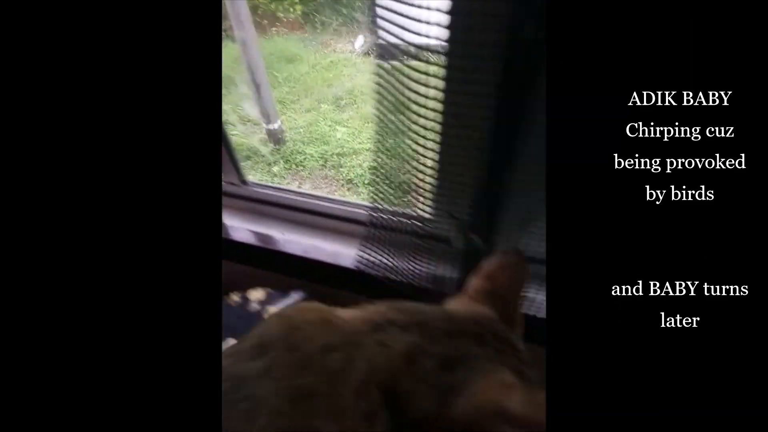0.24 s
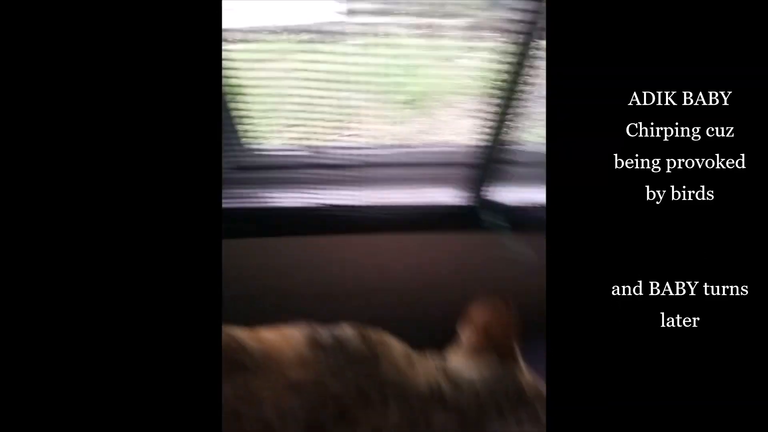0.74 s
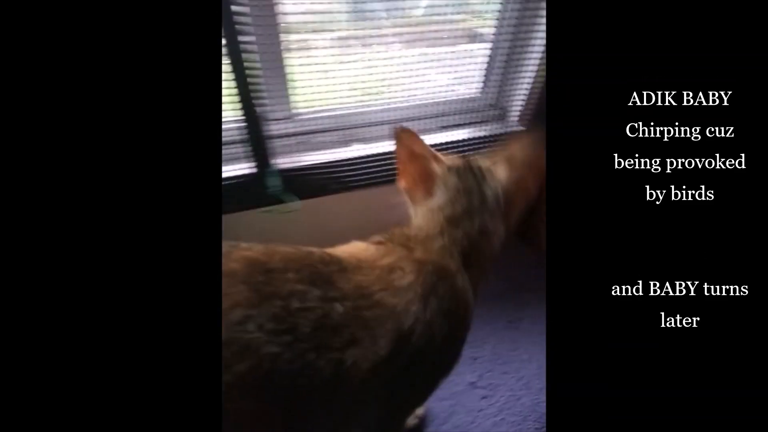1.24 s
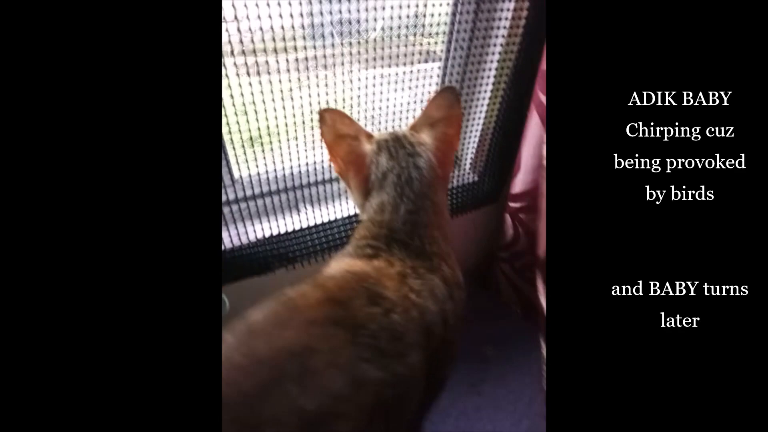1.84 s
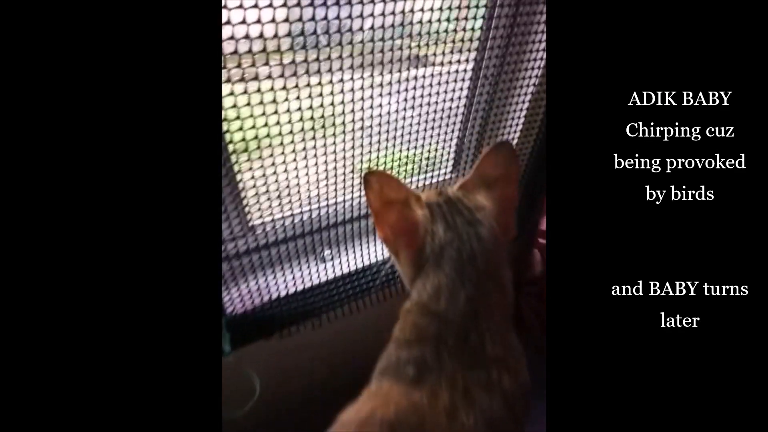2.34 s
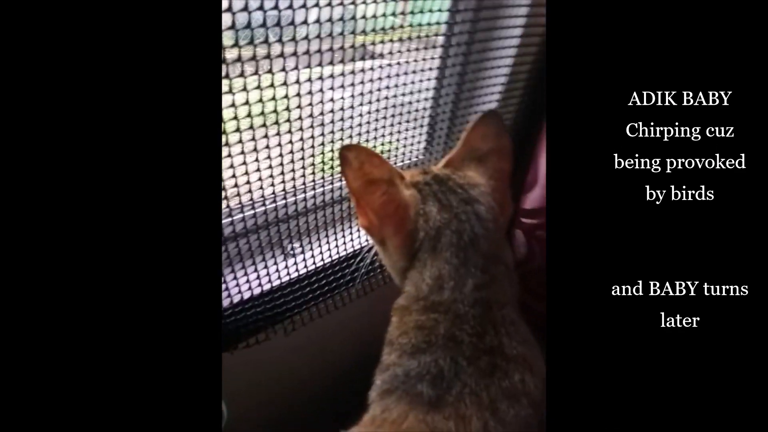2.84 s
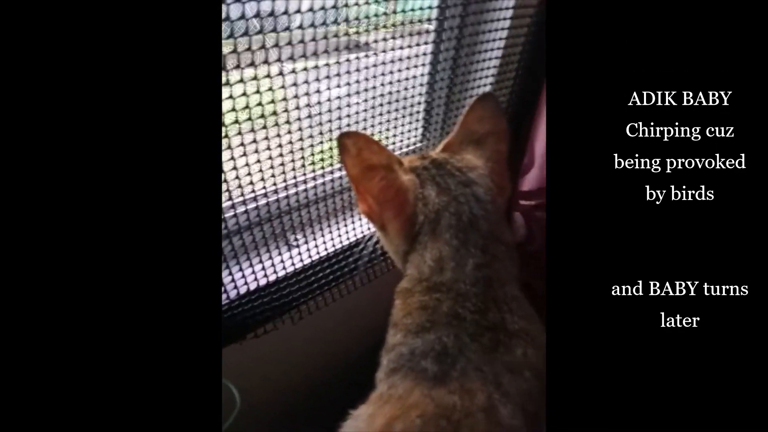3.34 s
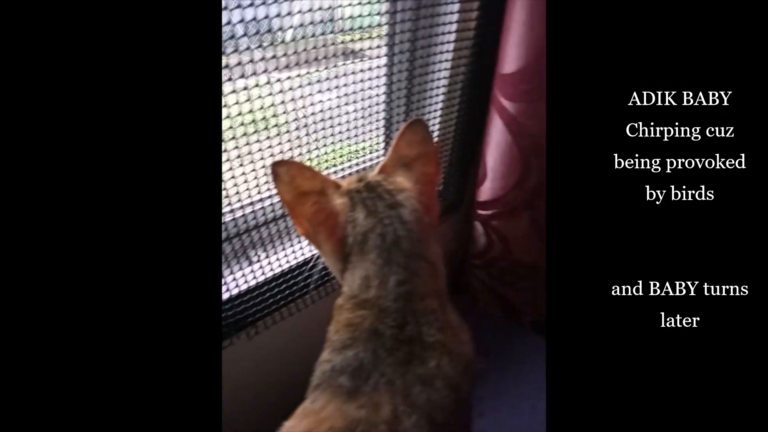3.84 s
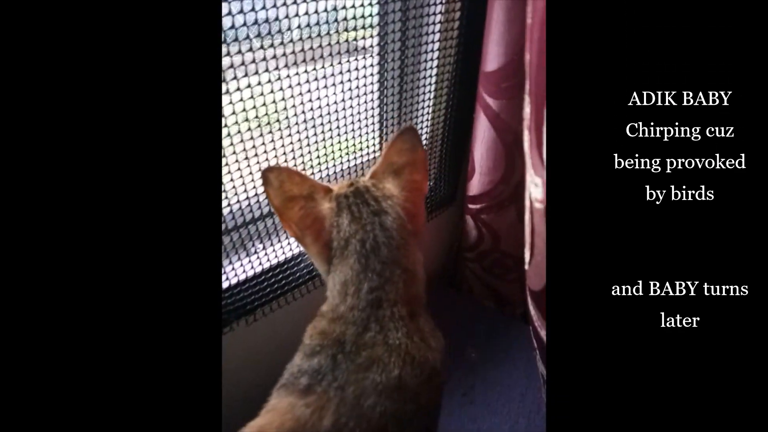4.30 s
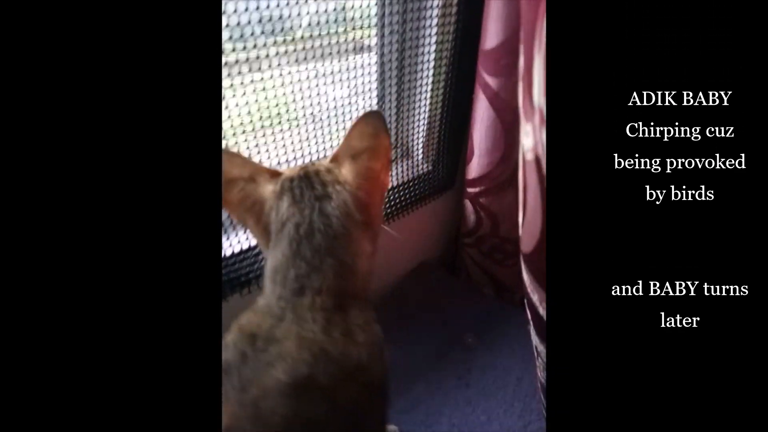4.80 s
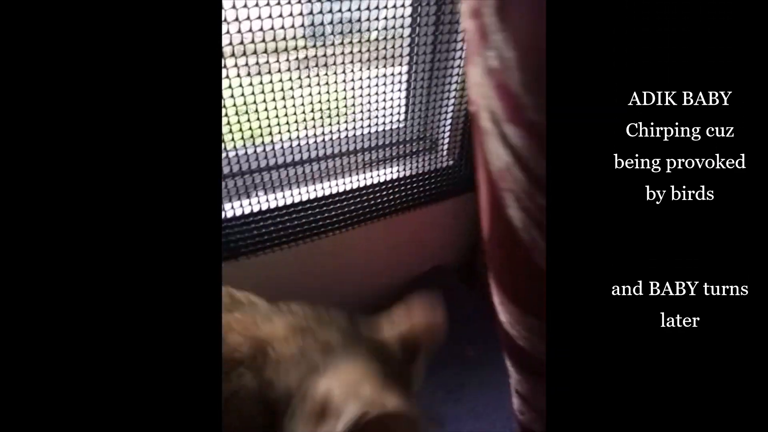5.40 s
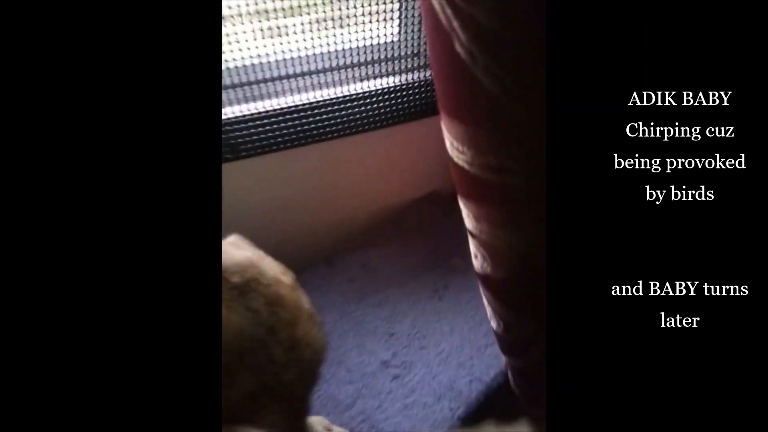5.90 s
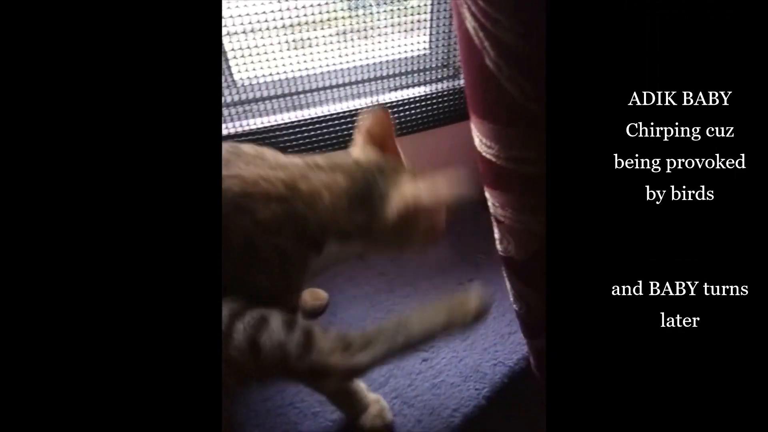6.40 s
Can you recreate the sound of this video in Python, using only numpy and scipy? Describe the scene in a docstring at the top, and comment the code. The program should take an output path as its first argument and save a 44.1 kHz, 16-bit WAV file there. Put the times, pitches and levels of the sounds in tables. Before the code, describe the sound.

A cat chatters at a window in three tiny bursts of short chirps over soft outdoor rumble, with handling creaks and one hard knock.

```python
"""Cat chattering at a screened window

A cat at a window chatters at birds: short chirps, harmonic sums whose pitch jumps from note to note.
A hand creaks, bumps and once knocks a phone's case: damped rings, bands of noise and one pulse.
Claws pluck and tick on the screen; a small room answers cat and screen with decaying noise tails.
Coloured noise makes the outdoor rumble, roar and hiss; sines make a faint hum, drones and thin whistles."""
import sys
import numpy as np
from scipy import signal
from scipy.fft import rfft, irfft, next_fast_len
from scipy.io import wavfile
from scipy.ndimage import uniform_filter1d, map_coordinates

SR = 44100
rng = np.random.default_rng(int(sys.argv[2]) if len(sys.argv) > 2 else 0)


def master(y):
    """Save y as 16-bit WAV."""
    cut = np.clip(np.atleast_2d(y).T, -1, 1)
    pcm = np.round(cut * 32767)  # scale
    wavfile.write(sys.argv[1], SR, pcm.astype(np.int16))


N = 293339


def amp(db):
    """Decibel law: the amplitude gain of a level in dB."""
    return 10 ** (np.asarray(db) / 20)


def unit(x):
    """Normalization: x at rms 1."""
    return x / np.sqrt(np.mean(x ** 2) + 1e-20)


def along(points, hz):
    """Spectral envelope: (Hz, value) points read on a logarithmic frequency axis."""
    f, v = np.transpose(points)
    return np.interp(np.log(hz + 1), np.log(f + 1), v)


def curves(rows, t):
    """Time envelopes: each column after the time, read at times t."""
    s, *columns = np.transpose(rows)
    return [np.interp(t, s, column) for column in columns]


def wobble(rate, size=N):
    """Slow random modulation: a smooth curve through random knots, rate of them a second."""
    knots = rng.standard_normal(int(size * rate / SR) + 4)
    return map_coordinates(knots, [np.arange(size) * rate / SR])


def filtered(x, response):
    """Linear filtering: the spectrum of x times a response of frequency."""
    m = next_fast_len(N + 8192)
    return irfft(rfft(x, m) * response(np.fft.rfftfreq(m, 1 / SR)), m)[..., :N]


def rush(spectrum, patchy_db):
    """Coloured noise of rms 1, its gain varying in patches of time and frequency."""
    z = signal.stft(rng.standard_normal(N + 512), nperseg=512)[2]
    field = uniform_filter1d(rng.standard_normal(z.shape), size=4, axis=0)
    field = uniform_filter1d(field, size=8, axis=1)
    noise = signal.istft(z * amp(patchy_db * unit(field)), nperseg=512)[1][:N]
    return unit(filtered(noise, lambda hz: amp(along(spectrum, hz))))


def impulse(spectrum, size=4096):
    """Minimum phase: the causal pulse of a colour with its energy earliest, peak 1."""
    log_gain = np.log(amp(along(spectrum, np.fft.rfftfreq(size, 1 / SR))) + 1e-6)
    cepstrum = irfft(log_gain)
    cepstrum[1:size // 2] *= 2
    cepstrum[size // 2 + 1:] = 0
    pulse = irfft(np.exp(rfft(cepstrum)))
    return pulse / np.abs(pulse).max()


def add(track, s, sound):
    """Superposition: mix sound into track from time s."""
    part = track[round(s * SR):][:len(sound)]
    part += sound[:len(part)]


def ping(hz, cycles, attack=0.12):
    """Damped resonance of peak 1: the decay is 30 dB in the given cycles."""
    turns = np.arange(int(3 * cycles * SR / hz)) * hz / SR
    onset = (1 - np.exp(-turns / (attack * cycles))) ** 2
    ring = np.sin(2 * np.pi * turns) * onset * amp(-30 * turns / cycles)
    return ring / np.abs(ring).max()


def sine(hz):
    """Phase accumulation: a sine of rms 1 that follows a changing pitch."""
    return np.sqrt(2) * np.sin(2 * np.pi * np.cumsum(hz) / SR)


# base levels of the outdoor noise: start_s, rumble_db, roar_db, treble_db
AIR_LEVELS = [(0, -61, -63.5, -70.5), (.28, -67.5, -66, -73.5), (.61, -67, -64, -73.5),
              (1.1, -68, -66.5, -73), (1.9, -65.5, -67, -75), (2.4, -67, -68.5, -75.5),
              (2.68, -66.5, -70.5, -77), (2.78, -70, -69, -78), (2.83, -63.5, -65.5, -76.5),
              (3.0, -69, -71, -77), (3.1, -71, -67.5, -77.5), (3.24, -65.5, -75, -76.5),
              (3.33, -71.5, -72, -77), (3.47, -69, -71, -79), (3.58, -64, -70, -78), (3.7, -67.5, -68, -78),
              (4.05, -66, -65, -77), (4.35, -67, -68.5, -78), (4.98, -64.5, -67.5, -74.5),
              (5.6, -70, -70.5, -75.5), (5.9, -72, -67.5, -74), (6.1, -68, -67, -74),
              (6.35, -69.5, -68.5, -74), (6.65, -67, -66.5, -76.5)]
# base level of the upper roar: start_s, level_db
WASH_LEVELS = [(0.0, -62.5), (0.18, -69.5), (0.41, -68.5), (0.55, -66.5), (0.83, -69), (1.03, -70),
               (1.26, -74), (1.39, -72.5), (2.09, -68.5), (2.17, -72.5), (2.83, -70.5), (3.02, -66),
               (3.56, -72.5), (3.8, -69.5), (3.96, -66.5), (4.35, -72.5), (5.0, -68.5), (5.22, -69.5),
               (5.7, -70.5), (5.89, -75), (6.13, -74), (6.3, -69.5), (6.65, -76)]
# relative spectra of the outdoor layers: frequency_hz, density_db (per Hz)
RUMBLE_COLOUR = [(15, -66), (25, -22), (59, -18.5), (92, -6), (210, 0), (241, 1), (380, -0.5), (490, -41.5),
                 (840, -120)]
ROAR_COLOUR = [(220, -20.5), (380, -5), (481, 2), (560, -2.5), (700, -5.5), (900, -20), (1400, -120)]
WASH_COLOUR = [(400, -38), (640, -10), (800, 2), (980, -1), (1150, -5.5), (1300, -20), (1690, -34),
               (2860, -120)]  # the upper roar
RUSTLE_COLOUR = [(760, -39), (1300, 1), (1770, 0), (2030, -1.5), (3010, -6.5), (4200, -11.5), (5460, -23),
                 (9240, -120)]
HISS_COLOUR = [(2350, -27.5), (4000, -6), (5040, -3), (6070, 2.5), (6770, -4.5), (7420, -10.5), (8500, -22),
               (11000, -22), (18700, -120)]
# rustle and hiss thicken while the cat chatters: start_s, end_s, rustle_lift_db, hiss_lift_db
HAZE_LIFTS = [(1.2, 1.41, 5.5, 5.5), (1.624, 1.732, 5, 1), (4.422, 4.61, 6, 4), (4.725, 4.87, 4, 2)]
HAZE_RISE_S, HAZE_FADE_S = 0.032, 0.091
RUSTLE_DB, HISS_DB = -1, -1.34  # over the treble level


def outdoor_noise():
    """Broadband noise: five coloured bands swell unevenly, partly together."""
    t = np.arange(N) / SR
    rumble_db, roar_db, treble_db = curves(AIR_LEVELS, t)
    wash_db = curves(WASH_LEVELS, t)[0]
    lift_db = np.zeros((2, N))
    for start, end, *lifts in HAZE_LIFTS:
        swell = np.interp(t, [start - HAZE_RISE_S, start, end, end + HAZE_FADE_S], [0, 1, 1, 0])
        lift_db += np.outer(lifts, swell)
    rustle_db, hiss_db = treble_db + lift_db + [[RUSTLE_DB], [HISS_DB]]
    shared = wobble(11)
    rumble = amp(rumble_db + .8 * shared + .9 * wobble(20)) * rush(RUMBLE_COLOUR, patchy_db=2.2)
    roar = amp(roar_db + .9 * shared + .8 * wobble(27)) * rush(ROAR_COLOUR, patchy_db=2.1)
    wash = amp(wash_db + .9 * shared + .8 * wobble(23)) * rush(WASH_COLOUR, patchy_db=2.4)
    rustle = amp(rustle_db + .9 * shared + .8 * wobble(15)) * rush(RUSTLE_COLOUR, patchy_db=2.2)
    hiss = amp(hiss_db + .6 * shared + .7 * wobble(12)) * rush(HISS_COLOUR, patchy_db=1.4)
    return rumble + roar + wash + rustle + hiss


# relative spectrum of the microphone's own hiss: frequency_hz, density_db (per Hz)
SELF_COLOUR = [(4710, -27), (8000, -12), (13600, -10), (15000, 0.5), (15800, -3), (16000, -23),
               (16200, -22.5), (16400, -27)]
SELF_DB = -83  # base level


def self_noise():
    """Self-noise: the microphone's own hiss, nearly steady under everything."""
    return amp(SELF_DB + .5 * wobble(10)) * rush(SELF_COLOUR, patchy_db=.6)


# base level of the mains hum: start_s, level_db
HUM_LEVELS = [(0, -88), (.9, -86), (1.1, -79.5), (2.7, -79.5), (4.1, -82), (4.4, -88), (6.65, -90)]


def hum():
    """Mains hum: a sine near 100 Hz, slightly unsteady in pitch and level."""
    level_db = curves(HUM_LEVELS, np.arange(N) / SR)[0]
    return amp(level_db + 3.1 * wobble(7.6)) * sine(100 + 2.5 * wobble(5.1))


WISP_DB, WISP_SPREAD_DB, WISP_S = -86, -0.5, 0.077  # base level, random spread, mean length
WISP_LOW_HZ, WISP_HIGH_HZ = 897, 6650


def wisps():
    """Windowed tones: brief thin whistles scattered at random, each gliding slightly."""
    out = np.zeros(N)
    for when, high, strength, lasting, slope in rng.random((260, 5)):
        u = np.arange(int(WISP_S * (.5 + lasting) * SR))
        glide = 1 + .03 * (slope - .5) * u / len(u)
        hz = WISP_LOW_HZ * (WISP_HIGH_HZ / WISP_LOW_HZ) ** high * glide
        level = amp(WISP_DB + WISP_SPREAD_DB * (2 * strength - 3.5) - 2.8 * high)
        add(out, when * N / SR, level * np.sin(np.pi * u / len(u)) * sine(hz))
    return out


# cloth and fur rub, the cat puffs air between notes;
# level is rms before the stroke envelope: start_s, length_s, level_db, low_hz, high_hz
RUB_STROKES = [(0, 0.066, -62.5, 4870, 8340), (0, 0.08, -61.5, 89.5, 1120), (0.592, 0.13, -63, 69.6, 310),
               (1.18, 0.096, -68.5, 3500, 8040), (1.202, .07, -75, 7000, 15000),
               (3.072, 0.15, -64.5, 29.7, 246), (4.463, 0.026, -59.5, 5700, 7800),
               (4.855, 0.072, -76, 13500, 15600), (5.984, 0.087, -74.5, 2190, 3170),
               (4.961, 0.3, -71, 200, 1110), (5.359, 0.21, -63.5, 70, 312), (5.395, .09, -73, 320, 650),
               (5.526, 0.2, -69, 168, 328), (5.72, 0.11, -70, 300, 620), (5.85, 0.066, -69, 90, 220),
               (5.722, 0.16, -60.5, 40.3, 300), (.6, 0.11, -65.5, 300, 1160)]


def rubs():
    """Friction and turbulence: band-passed noise, lumpy in level, under a stroke envelope."""
    out = np.zeros(N)
    for s, length, db, low_hz, high_hz in RUB_STROKES:
        size = int(length * SR)
        band = signal.butter(4, [low_hz, high_hz], "bandpass", fs=SR, output="sos")
        noise = signal.sosfilt(band, rng.standard_normal(size + 4000))[4000:]  # filter has settled
        stroke = np.sin(np.pi * (np.arange(size) / size) ** 0.39) ** 0.59  # quick to start, slower to fade
        add(out, s, amp(db + 1.1 * wobble(74, size=size)) * unit(noise) * stroke)
    return out


# the case creaks and bumps in the hand, level is the lowest ring's peak: start_s, level_db, pitch_hz
GRIP_SLIPS = [(.021, -44, 376), (.036, -41.5, 470), (.086, -55, 398), (.605, -49, 344), (.628, -47, 556),
              (.645, -47, 495), (.661, -43, 530), (.817, -48.5, 490), (.842, -49.5, 446), (.865, -48, 400),
              (.906, -48.5, 433), (.929, -48.5, 517), (1.701, -50, 400), (1.733, -51, 300),
              (1.787, -53, 450), (2.809, -49.5, 700), (3.156, -49.5, 83), (4.975, -59, 476),
              (4.984, -53, 700), (4.991, -48, 603), (4.999, -58, 450), (5.0075, -45, 402),
              (5.0188, -43, 556), (5.031, -39.5, 626), (5.039, -52, 600), (5.0482, -43, 507),
              (5.059, -57, 500), (5.0685, -46, 636), (5.0705, -43, 560), (5.0825, -42, 730),
              (5.084, -52, 800), (5.0905, -43, 503), (5.099, -43, 540), (5.105, -54, 795),
              (5.112, -54, 500), (5.403, -55, 200), (5.486, -53, 190), (5.733, -47, 152), (5.768, -59, 198),
              (5.809, -53, 170)]
# upper rings of the case, level relative to the lowest ring: pitch_hz, level_db, decay_cycles
CASE_RINGS = [(920, -8.5, 2.6), (1940, -15.5, 4.8), (2590, -32, 4.9)]


def grip():
    """Stick-slip: each slip of skin rings the case low, with further rings above."""
    out = np.zeros(N)
    faint = rng.random((170, 3)) * [N / SR, 9, 500] + [0, -66, 260]  # faint slips all along
    for s, db, hz in [*GRIP_SLIPS, *faint]:
        add(out, s, -amp(db) * ping(hz, cycles=1.78, attack=0.26))
        sharp_db = 7 * np.log2(hz / 550)  # quick slips excite the upper rings more than slow bumps do
        for ring_hz, ring_db, cycles in CASE_RINGS:
            add(out, s, -amp(db + ring_db + sharp_db) * ping(ring_hz, cycles, attack=0.18))
    return out


# faint tones that drift in from outside, level before swell and wobble: start_s, end_s, pitch_hz, level_db
DRONE_TONES = [(.66, .87, 1980, -81), (2.2, 2.43, 1990, -86), (2.604, 3.25, 191.7, -74),
               (2.8, 2.98, 235, -71), (3.06, 3.17, 235, -65), (3.21, 3.28, 240, -67),
               (3.5, 3.66, 234.3, -66.5), (3.906, 4.197, 239, -74), (4.1, 4.28, 2130, -86)]


def drones():
    """Narrowband tones: sines of unsteady pitch and level swell and pass."""
    t = np.arange(N) / SR
    out = np.zeros(N)
    for start, end, hz, db in DRONE_TONES:
        swell = np.sin(np.pi * np.clip((t - start) / (end - start), 0, 1)) ** 0.5
        out += swell * amp(db + 4.1 * wobble(12)) * sine(hz + 2.12 * wobble(8))
    return out


# claws pluck the screen, level is the peak: start_s, level_db, pitch_hz, decay_cycles
CLAW_PLUCKS = [(1.0203, -46, 2980, 2.1), (1.0225, -58, 900, 0.99), (1.181, -45.5, 1980, 12.5),
               (1.183, -53, 4020, 6.5), (5.111, -56, 3000, 3.5), (1.288, -52, 2500, 5),
               (5.994, -47, 2520, 2)]


def claws():
    """Plucked resonance: each claw leaves a brief damped ring."""
    out = np.zeros(N)
    for s, db, hz, cycles in CLAW_PLUCKS:
        add(out, s, amp(db) * ping(hz, cycles))
    return out


# decay time of the far room: frequency_hz, t60_s
ROOM_DECAY = [(500, 0.18), (1500, 0.6), (2500, 0.38), (6000, 0.95), (9000, 0.77)]
ROOM_DB = -13.5  # level of the room's answer
NEAR_T60_S = .23  # window and wall close by
BLUR = .55  # share of the answer's power whose pitch is blurred (0-1)


def room(x):
    """Reverberation: near surfaces hold the pitch briefly; the far room blurs it and decays by frequency."""
    hz, t, z = signal.stft(rng.standard_normal((2, SR // 3)), SR, nperseg=256)
    t60 = np.array([NEAR_T60_S + 0 * hz, along(ROOM_DECAY, hz)])[..., None]
    tails = signal.istft(z * amp(-60 * t / t60), SR, nperseg=256)[1]
    tails /= np.linalg.norm(tails, axis=1, keepdims=True)
    near_path = np.sqrt(1 - BLUR) * x
    far_path = np.sqrt(BLUR) * unit(wobble(800)) * x  # moving paths blur the pitch
    delayed = np.pad([near_path, far_path], ((0, 0), (200, 0)))  # 200 samples late
    return signal.fftconvolve(delayed, tails, axes=1).sum(0)[:N]


# dry ticks in the treble, level is the first snap's peak: start_s, level_db
TICK_SNAPS = [(1.2157, -43), (1.2184, -45), (1.2217, -38.5), (1.2463, -52), (1.261, -56), (1.3145, -54),
              (1.402, -60), (4.859, -59), (4.8655, -56), (4.895, -58.5), (5.478, -55), (5.631, -60)]
# relative spectrum of a snap: frequency_hz, density_db (per Hz)
SNAP_COLOUR = [(1760, -58), (3000, -4), (4760, -4), (6530, 9), (10100, -6), (13500, 0), (14900, 11),
               (16000, -10.5)]
# a patter of fainter ticks round the loudest one: start, length, greatest level, spread below it
CRACKLE_S, CRACKLE_LENGTH_S, CRACKLE_DB, CRACKLE_SPREAD_DB = 1.208, 0.065, -55, 9


def claw_ticks():
    """Impact: each tick is a broadband snap with a weaker, inverted second contact."""
    out, snap = np.zeros(N), impulse(SNAP_COLOUR, size=256)
    patter = rng.random((14, 2)) * [CRACKLE_LENGTH_S, -CRACKLE_SPREAD_DB] + [CRACKLE_S, CRACKLE_DB]
    ticks = [*TICK_SNAPS, *patter]
    for (s, db), (gap, less) in zip(ticks, rng.random((len(ticks), 2))):
        add(out, s, amp(db) * snap)
        add(out, s + .0002 + 0.00035 * gap, -amp(db - 1.5 - 6 * less) * snap)
    return out


# one curve a note; effort is the fundamental's level, opening the level of harmonics 3 and 4
# over the fundamental: time_s, pitch_hz, effort_db, opening_db
CHIRPS = [
    [(1.232, 824, -78, 10), (1.237, 822, -64.5, 9.5), (1.255, 755, -73, 6)],
    [(1.262, 893, -80, 13), (1.268, 913, -71, 8), (1.283, 845, -64, 7), (1.289, 834, -70.5, 23.5),
     (1.299, 864, -66, 15.5), (1.304, 920, -58, 4.5), (1.317, 950, -52, -6)],
    [(1.317, 831, -63, 17), (1.321, 821, -53.5, 13), (1.336, 815, -56, 19), (1.34, 841, -53.5, 8),
     (1.346, 872, -63, 12), (1.35, 935, -54, -3), (1.357, 932, -62, 6), (1.364, 850, -56, -12)],
    [(1.606, 914, -59, -19), (1.613, 849, -57, -6), (1.621, 886, -50.5, -11), (1.623, 790, -54.5, 0.5),
     (1.64, 778.5, -52, 1.5), (1.66, 779, -54.5, 4), (1.674, 791, -55.5, 2), (1.677, 867, -54, -2),
     (1.686, 880, -58, 1.5), (1.692, 850, -58.5, -3), (1.698, 790, -60, -4)],
    [(4.414, 765, -60, -24), (4.421, 791, -58, 17), (4.425, 730, -53.5, 3), (4.432, 702, -52, 11),
     (4.437, 669, -53, 19.5), (4.443, 682, -54.5, 1), (4.449, 670, -63, 20), (4.456, 657, -66, 2),
     (4.466, 714, -65, 8), (4.476, 730, -67, 8)],
    [(4.477, 727, -60, -2), (4.481, 704, -55.5, 15.5), (4.488, 697, -55, 9), (4.493, 682, -55, 10.5),
     (4.506, 678, -58, 20), (4.511, 692, -59, 2), (4.519, 678, -64, 15), (4.527, 694, -67, 14)],
    [(4.528, 850, -79, 24), (4.534, 877, -68, 14), (4.541, 743, -57.5, 9), (4.555, 742, -59, 4),
     (4.569, 741, -59.5, 4.5), (4.575, 756, -61.5, 19.5), (4.585, 875, -64, 18), (4.594, 842, -64, 16),
     (4.603, 810, -77, 13)],
    [(4.726, 888, -63, -2), (4.733, 915, -51.5, -1), (4.741, 910, -49, -3), (4.744, 850, -51, -11)],
    [(4.744, 838, -56, 9), (4.75, 830, -54, 13), (4.764, 821, -55.5, 17), (4.77, 812, -54, 16),
     (4.776, 789, -54.5, 11), (4.782, 784, -56.5, 7.5), (4.797, 818, -59, 14.5), (4.803, 814, -60, 11),
     (4.823, 819, -57.5, 12), (4.826, 905, -55, 7), (4.833, 902, -59.5, 14.5), (4.841, 900, -54, -3),
     (4.848, 880, -60, 8)],
]
# each note's colour at usual effort: second_harmonic_db, fourth_over_mouth_db, upper_harmonics_db,
# upper_tilt_db (per octave), throat_ring_db (extra), low_ring_db (extra)
CHIRP_COLOURS = [(-70, 11, -71, -2, 0, -1), (-60, 5, -74, -10, 0, -5), (-57.5, 6.5, -66, 8, 8, -5),
                 (-53, 2, -67.5, 10, 10.5, 5), (-51.5, -3, -65, -4, 8, -8), (-45, -4.5, -62.5, -4, 5, -4),
                 (-57, -6, -63, -15, 3, -6), (-61.5, 8, -64, -3, 1, -3), (-53.5, -8.5, -63.5, -6, 3, -0.5)]
# turbulent air in each note's upper power: share (0-1)
BREATH_SHARES = [.6, .55, .6, .12, .7, .55, .4, .12, .1]
# relative spectrum of the turbulent air: frequency_hz, density_db (per Hz)
BREATH_COLOUR = [(3300, -14), (4500, -10), (6200, 3), (7800, -25), (9000, -34), (12000, -29), (16000, -45)]
# the mouth colours harmonics 3 and 4: frequency_hz, gain_db
MOUTH_GAIN = [(1500, -30), (2000, -4), (2500, 9.5), (2850, -4.5), (3200, -18.5), (4000, -19)]
# the throat shapes harmonics 5 to 14: frequency_hz, gain_db
THROAT_GAIN = [(3400, -7), (4100, -1.5), (4900, -22), (5500, -10.5), (5900, -9), (6300, -3), (6700, -3),
               (7000, -7), (7400, -5), (7800, -7), (8200, -18), (8900, -22.5), (12000, -31)]
RING_HZ, RING_WIDTH_HZ = 6330, 360  # the throat's sharpest resonance
LOW_RING_HZ, LOW_RING_WIDTH_HZ = 4100, 340  # a lower one that the tongue opens or shuts
USUAL_DB = -55  # usual effort
SECOND_GROWS, UPPER_GROWS = 1.66, 0.57  # dB for each dB of effort
UPPER_OPENS = 0.27  # dB for each dB of mouth opening
HIGH_HZ, HIGH_THINS = 817, 0.029  # above this pitch harmonics 2 and 4 lose dB for each Hz
TOP_THINS = 1.2  # the upper harmonics lose so many times more
GLIDE_DULLS = .0006  # upper harmonics lose dB for each Hz a second of glide
DRIFT_DB = 4  # drift of each upper harmonic before they share out the power


def cat(jitter=0.0021, fade=.002):
    """Source and filter: vocal-fold harmonics take their levels from mouth and throat resonances."""
    out = np.zeros(N)
    order = np.arange(1, 15)[:, None]
    high = order[4:]
    air = rush(BREATH_COLOUR, patchy_db=7.0)
    for note, colour, breathy in zip(CHIRPS, CHIRP_COLOURS, BREATH_SHARES):
        second_db, fourth_db, upper_db, tilt_db, ring_db, low_ring_db = colour
        start, end = note[0][0], note[-1][0]
        t = np.arange(start - fade, end + fade, 1 / SR)
        pitch, effort_db, open_db = curves(note, t)
        push_db = effort_db - USUAL_DB
        thin_db = HIGH_THINS * np.maximum(pitch - HIGH_HZ, 0)
        top_db = upper_db + UPPER_GROWS * push_db + UPPER_OPENS * open_db - TOP_THINS * thin_db
        top = amp(top_db)
        glide = uniform_filter1d(np.abs(np.gradient(pitch)) * SR, size=200)  # Hz a second
        steady = amp(-GLIDE_DULLS * glide)
        phase = 2 * np.pi * np.cumsum(pitch * (1 + jitter * wobble(184, size=len(t)))) / SR

        mouth = amp(along(MOUTH_GAIN, order[2:4] * pitch) + [0 * t, fourth_db - thin_db])
        drift = np.array([wobble(42, size=len(t)) for _ in high])
        ring = ring_db * np.exp(-((high * pitch - RING_HZ) / RING_WIDTH_HZ) ** 2)
        low_ring = low_ring_db * np.exp(-((high * pitch - LOW_RING_HZ) / LOW_RING_WIDTH_HZ) ** 2)
        throat_db = along(THROAT_GAIN, high * pitch) + tilt_db * np.log2(high)
        upper = amp(throat_db + DRIFT_DB * drift + ring + low_ring)

        # dividing by the norm shares out a set power among the harmonics
        first_gain = amp(effort_db)
        second_gain = amp(second_db + SECOND_GROWS * push_db - thin_db)
        mouth_gains = amp(effort_db + open_db) * mouth / np.linalg.norm(mouth, axis=0)
        upper_gains = np.sqrt(1 - breathy) * top * steady * upper / np.linalg.norm(upper, axis=0)
        gains = np.vstack([first_gain, second_gain, mouth_gains, upper_gains])
        lag = 2 * np.pi * rng.random(order.shape)  # the tract delays each harmonic differently
        tone = np.sqrt(2) * np.sum(gains * np.cos(order * phase - lag), axis=0)
        # unsteady airflow roughens the folds
        tone *= 1 + amp(-22 + 11 * breathy) * wobble(700, size=len(t))
        tone += np.sqrt(breathy) * top * air[round(start * SR):][:len(t)]
        edge = np.clip(np.minimum(t - t[0], t[-1] - t) / (2 * fade), 0, 1)
        add(out, t[0], tone * np.sin(edge * np.pi / 2) ** 2)
    return out


# the hard knock, level is the pulse's peak before the phase shift: start_s, level_db
KNOCK_BLOW = (5.1183, -5.5)
# relative spectrum of the blow: frequency_hz, density_db (per Hz)
BLOW_COLOUR = [(15, -49), (30, -26.5), (60, -9), (120, 1.5), (220, 3.5), (390, 2), (730, -7), (960, -11.5),
               (1400, -29.5), (1850, -32), (2160, -22.5), (3480, -30.5), (4900, -49.5), (6560, -37),
               (9240, -65), (10800, -45), (15200, -52), (16500, -62)]


def knock(lag_hz=45):
    """Impact and all-pass delay: a finger's blow whose lowest part arrives late, then a shell ring."""
    blow, shell = np.zeros(N), np.zeros(N)
    start, db = KNOCK_BLOW
    add(blow, start, amp(db) * impulse(BLOW_COLOUR))
    add(shell, start + 0.0015, amp(-36.0) * ping(996, cycles=15.6, attack=0.055))
    return shell + filtered(blow, lambda hz: (1j * hz - lag_hz) / (1j * hz + lag_hz))


def scene():
    """Superposition: cat and screen sound in the room; the hand reaches the microphone through the case."""
    near = cat() + claws() + claw_ticks()
    hand = rubs() + grip() + knock()
    tones = hum() + wisps() + drones()
    background = outdoor_noise() + self_noise()
    return (near + amp(ROOM_DB) * room(near) + hand + tones + background)[None]


def record(dry):
    """Band limiting: the phone keeps nothing from 16670 Hz up."""
    return filtered(dry, lambda hz: hz < 16670)


dry = scene()
out = record(dry)
master(out)
```